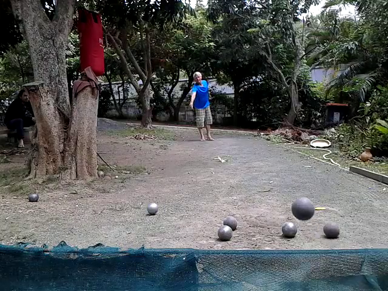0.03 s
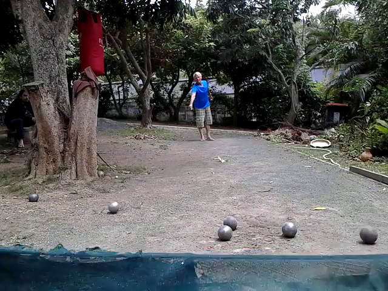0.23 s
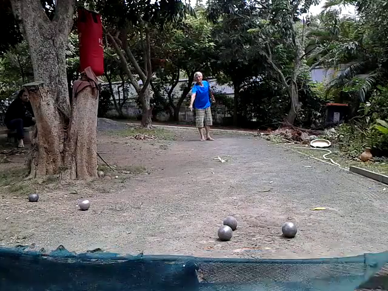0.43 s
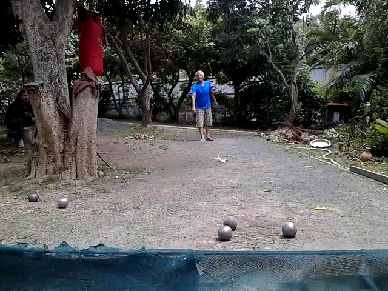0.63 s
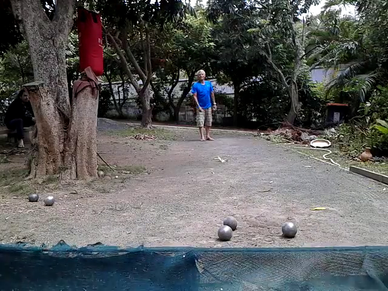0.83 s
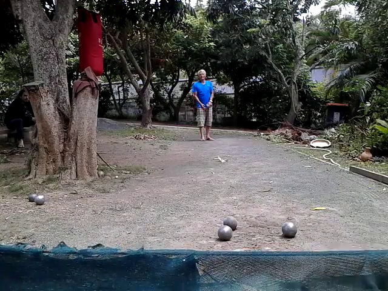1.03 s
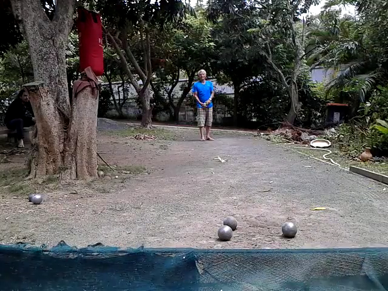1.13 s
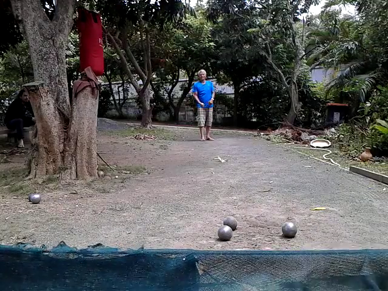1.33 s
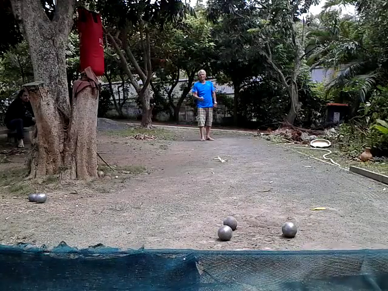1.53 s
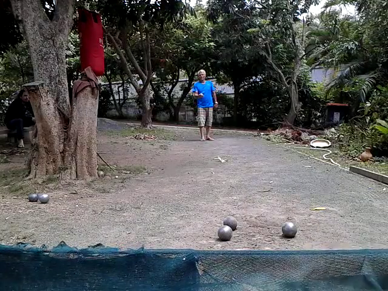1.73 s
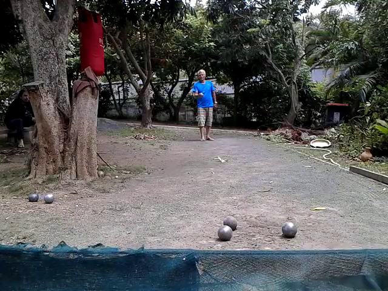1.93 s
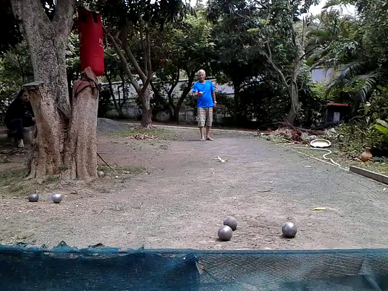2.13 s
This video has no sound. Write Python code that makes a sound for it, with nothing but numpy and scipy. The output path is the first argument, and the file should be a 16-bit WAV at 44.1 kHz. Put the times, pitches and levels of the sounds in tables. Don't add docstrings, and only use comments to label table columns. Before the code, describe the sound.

A heavy metal ball strikes metal edging very close to a small overloading microphone, clanging, scraping and rattling in quick bounces, then rolls and taps over gravel while distant birds chirp and whistle in a garden.

```python
import sys
import numpy as np
from scipy import signal
from scipy.fft import rfft, irfft
from scipy.io import wavfile
from scipy.ndimage import uniform_filter1d

SR = 44100
rng = np.random.default_rng(int(sys.argv[2]) if len(sys.argv) > 2 else 0)


def output_pcm(signal):
    pcm = np.clip(np.atleast_2d(signal).T, -1, 1) * 32767
    wavfile.write(sys.argv[1], SR, np.round(pcm).astype(np.int16))


def field_ratio(decibels):
    return 10 ** (np.asarray(decibels, dtype=float) / 20)


N = 97020
T = np.arange(N) / SR

# (frequency [Hz], density [dB per Hz])
AIR_COLOUR = [(18, -54.5), (30, 17.5), (312, -3), (774, -7), (1520, -11.5), (1780, -40), (2630, -7),
              (4900, -5), (15000, -76)]
# (time [s], level [dB])
ROLL = [
    (0, -28),
    (.05, -33.5),
    (.1, -38.5),
    (.15, -44.5),
    (.45, -40),
    (.7, -52),
    (1.1, -57.5),
    (1.19, -59),
    (1.3, -51),
    (1.4, -60.5),
]
# (frequency [Hz], density [dB per Hz])
GRAVEL_COLOUR = [(47, -48), (80, 4), (148, 2.5), (499, -15), (1500, -3), (2160, -5), (5240, -13),
                 (8000, -62.5), (10400, -84), (17600, -120)]
TAP_S = [.0050, .0710, .0895, .1590, .1592, .1830, .2357, .2399, .262, .265, .312, .315, .380, .442, .4455,
         .4462, .4465, .4615, .6320, .8545, .925, .933, 1.1695, 1.1703, 1.1710, 1.1712, 1.1713, 1.1716,
         1.261, 1.89]
# (level [dB], frequency [Hz], t60 [s])
TAP_MODES = [(-23, 1800, .014), (-24.5, 1910, .012), (-26, 2600, .012), (-26.5, 470, .04),
             (-21.5, 2300, .007), (-37, 4100, .0055), (-25, 7200, .05), (8, 3000, 0.00352),
             (-16.5, 1150, 0.12), (-17, 70.4, .1), (-14.5, 4200, 0.3), (-18.5, 1610, .25),
             (-28, 4200, 0.12), (-25.5, 118, 0.068), (-6, 3800, 0.012), (-12.5, 1411, 0.061),
             (-20, 1520, 0.092), (-15.5, 1800, 0.01), (-25.5, 1620, 0.013), (-32, 1200, 0.0082),
             (-36.5, 6900, 0.015), (-44.5, 7900, 0.011), (-23, 2800, 0.0021), (-5.5, 3770, 0.0079),
             (-25.5, 2100, 0.0042), (-14, 1160, 0.0043), (-5.5, 378, 0.02), (-4.5, 859, 0.0087),
             (-25.5, 408, .017), (-44.5, 280, 0.072)]
# (time [s], level [dB])
BUMPS = [(0.159, -28), (0.419, -31.5), (0.445, -27.5), (0.463, -22), (0.485, -26.5), (.503, -23.5),
         (0.531, -35), (.552, -35), (0.571, -27.5), (0.607, -29.5), (0.634, -31.5), (.66, -35),
         (0.686, -31.5), (0.712, -34.5), (.740, -30), (0.783, -31), (0.821, -26.5), (0.834, -25),
         (0.849, -25.5), (.893, -26), (0.919, -26), (.962, -22), (.974, -23.5), (0.996, -24), (1.022, -33),
         (1.078, -29)]
# (time [s], level [dB])
TICKS = [(.1595, -31), (0.447, -18.5), (.4985, -44.5), (0.571, -44), (0.5833, -44), (0.6332, -32),
         (.6880, -40), (.7605, -45.5), (0.7825, -43), (0.8125, -41.5), (0.8543, -39), (.8940, -51),
         (0.927, -38.5), (0.934, -38.5), (1.159, -41), (1.26, -45), (1.2780, -34), (1.2844, -35.5)]
# (frequency [Hz], density [dB per Hz])
TICK_COLOUR = [(300, -20), (1500, 0), (3500, -2), (5500, -6), (7500, -20), (15000, -45)]
# (time [s], length [s], start frequency [Hz], end frequency [Hz], level [dB])
CHIRPS = [(0.183, 0.04, 3400, 4660, -38.5), (0.189, 0.023, 5900, 6170, -47),
          (0.222, 0.015, 4750, 4800, -32.5), (0.5, 0.04, 4425, 3250, -36), (0.533, 0.02, 4100, 3620, -45),
          (0.691, 0.022, 6100, 5650, -45), (0.7, 0.011, 4250, 4000, -32), (0.708, 0.016, 5600, 4770, -42),
          (0.725, 0.013, 4400, 3460, -36), (.754, 0.01, 4300, 3500, -32), (0.779, 0.02, 4200, 3380, -40),
          (1.01, 0.045, 5600, 6760, -57.5), (1.054, 0.0074, 4000, 6140, -33),
          (1.063, 0.033, 4200, 4930, -38.5), (1.079, 0.023, 6200, 3395, -34),
          (1.12, 0.018, 4600, 3283, -29.5), (1.148, 0.025, 3500, 5580, -35),
          (1.185, 0.028, 5500, 3320, -48), (1.395, 0.028, 3300, 4360, -47.5),
          (1.433, 0.022, 5200, 6360, -39.5), (1.492, 0.019, 6280, 6170, -58),
          (1.455, .025, 6400, 4750, -41.5), (1.524, 0.02, 3900, 4320, -45.5),
          (1.532, 0.031, 4800, 5410, -43), (1.582, 0.045, 5300, 3840, -49.5),
          (1.736, 0.0206, 5310, 5370, -41.5), (1.755, 0.028, 5360, 5770, -42),
          (1.76, 0.031, 5300, 3250, -35), (1.804, 0.04, 4042, 2860, -36), (1.868, 0.035, 4540, 4780, -38),
          (1.877, 0.037, 3000, 3897, -36), (1.928, 0.05, 4100, 3090, -40.5), (2.05, 0.03, 4250, 3623, -41),
          (2.098, 0.039, 3800, 3000, -46.5)]
# (time [s], level [dB])
SCRAPE = [
    (.240, -9.5),
    (.262, -20),
    (.295, -18),
    (.330, -16.5),
    (.365, -27),
    (.400, -27.5),
    (.438, -74),
]
# (frequency [Hz], density [dB per Hz])
SCRAPE_COLOUR = [(60, -37), (150, -10.5), (900, -11.5), (2860, -8), (6800, -10), (7800, -28.5),
                 (11000, -35.5), (15500, -45.5)]
# (time [s], strength [dB])
BLOWS = [
    (.2410, 0),
    (.2463, -5),
    (.2745, -8),
    (.3105, -10.5),
    (.3250, -10.5),
    (.4442, -25.5),
]
EDGE_HZ = [2345, 2860, 3052, 3618, 3827, 4034, 4464, 5142, 5387, 5877, 6384, 6644, 6906, 7183]
# (level [dB], t60 [s])
EDGE_MODES = [(-37, 0.201), (-1, 0.26), (-8.5, 0.46), (-5.5, 0.25), (5, 0.31), (-9.5, 0.3), (-8.5, .2),
              (-18, 0.14), (-7, 0.23), (1.5, 0.13), (-6, 0.35), (-0.5, 0.24), (-8, 0.18), (-4.5, 0.22)]
# (frequency [Hz], level per mode [dB], t60 [s])
SHEET = [(151.3, -19.5, 0.33), (490, -28, 0.18), (1500, -29, 0.23), (3000, -21.5, 0.28), (6550, -14, 0.11),
         (7300, -31, 0.2), (10700, -32, 0.12), (15340, -46, .15)]
# (time [s], level [dB], frequency [Hz], t60 [s])
RATTLE = [
    (0.2744, 7.5, 2876, 0.012),
    (0.2793, 7.5, 3010, 0.0084),
    (0.3, -7.5, 3100, 0.022),
    (0.311, -0.5, 2746, 0.022),
    (0.324, -6, 2945, 0.049),
    (0.342, -12, 2940, 0.034),
    (.3600, -7, 2780, 0.021),
    (0.38, -16, 2870, 0.021),
    (.3950, -14, 3060, 0.031),
]
# (frequency [Hz], level [dB], t60 [s])
REBOUND_MODES = [(5320, -37, 0.093), (6643, -34.5, 0.074), (7110, -42, .07), (7200, -45, .08),
                 (7720, -37, 0.12), (8570, -47.5, .08), (8800, -47, 0.1), (9100, -43, 0.12),
                 (9600, -47, 0.17), (10100, -49.5, 0.07), (11940, -48.5, 0.12), (13900, -48.5, 0.05)]
# (frequency [Hz], level [dB], t60 [s])
CLINK_MODES = [(6850, -49, 0.076), (7460, -47, 0.095), (7750, -56, 0.046), (8350, -56, 0.036),
               (8900, -56, 0.045)]
# (time [s], length [s], level [dB], start frequency [Hz], end frequency [Hz])
WHISTLES = [
    (0.95, 0.044, -34, 2700, 2673),
    (1.172, 0.059, -30, 2700, 2726),
    (1.409, 0.019, -32.5, 2680, 2728),
    (1.429, 0.018, -34, 2720, 2804),
    (1.449, .03, -33, 2790, 2787),
    (1.664, .023, -30, 2800, 2762),
    (1.690, 0.01392, -32, 2740, 2687),
    (1.913, 0.048, -28, 2900, 2724),
]

REBOUND_S = .4442
TAP_RISE_S = .0006


def read(table, hz, col=1):
    points = np.array(table)
    return np.interp(np.log(hz), np.log(points[:, 0]), points[:, col])


def noise(colour):
    hz = np.arange(1, N // 2 + 2) * SR / N
    x = irfft(rfft(rng.standard_normal(N)) * field_ratio(read(colour, hz)), N)
    return x / x.std()


def walk(rate_hz):
    hold = int(SR / rate_hz)
    steps = rng.standard_normal(N)[np.arange(N) // hold]
    return 1.3 * uniform_filter1d(uniform_filter1d(steps, hold), hold)


def add_mode(out, start_s, db, hz, t60_s, rise_s=0):
    i = int(np.ceil(start_s * SR))
    t = T[i:i + int(1.2 * t60_s * SR) + 8] - start_s
    rise = np.sin(np.pi / 2 * np.minimum(t / (rise_s + 1e-9), 1)) ** 2
    out[i:i + len(t)] += field_ratio(db - 60 * t / t60_s) * np.sin(2 * np.pi * hz * t) * rise


def note(start_s, length_s, hz, db):
    arch = np.sin(np.pi * np.clip((T - start_s) / length_s, 0, 1))
    phase = 2 * np.pi * np.cumsum(hz + 0 * T) / SR
    return field_ratio(db) * np.clip(arch * 2.6, 0, 1) * np.sin(phase)


def glide(start_s, length_s, start_hz, end_hz):
    return np.interp(T, [start_s, start_s + length_s], [start_hz, end_hz])


def garden(x, t60_s, gap_s):
    t = T[:SR]
    decay_db = 1.5 * walk(90)[:SR] - 60 * t / t60_s
    ir = rng.standard_normal(SR) * field_ratio(decay_db) * np.clip(t / gap_s, 0, 1)
    return signal.fftconvolve(x, ir / np.sqrt(np.sum(ir ** 2)))[:N]


def air():
    return noise(AIR_COLOUR) * field_ratio(-47 + 1.8 * walk(7.81))


def rolling():
    level_db = np.interp(T, *np.array(ROLL).T)
    return field_ratio(level_db + 1.8 * walk(170) + 2.0 * walk(30)) * noise(GRAVEL_COLOUR)


def taps():
    crack_db, crack_tilt_db, crack_t60_s = -11, -9, .007
    out = np.zeros(N)
    for s, (db, hz, t60_s) in zip(TAP_S, TAP_MODES):
        add_mode(out, s, db, hz, t60_s, TAP_RISE_S)
        low_hz, high_hz = hz * .4, min(hz * 3.5, 6300)
        for u in rng.random(9):
            crack_hz = low_hz + u * (high_hz - low_hz)
            add_mode(out, s, db + crack_db + crack_tilt_db * u, crack_hz, crack_t60_s, TAP_RISE_S)
    return out


def bumps():
    base_hz, fall_hz_per_s, t60_s = 296, 237, 0.05
    out = np.zeros(N)
    for s, db in BUMPS:
        pitch_luck, overtone_luck = rng.random(2)
        hz = (base_hz - fall_hz_per_s * max(s - REBOUND_S, 0)) * (0.774 + 0.39 * pitch_luck)
        add_mode(out, s, db, hz, t60_s, rise_s=0.0012)
        add_mode(out, s, db - 9.0, hz * (1.7 + overtone_luck), t60_s, rise_s=0.0084)
    return out


def grit():
    t60_s = .012
    gate = np.zeros(N)
    for s, db in TICKS:
        slope_s = np.where(T > s, t60_s, t60_s / 5)
        gate += field_ratio(db - 60 * np.abs(T - s) / slope_s)
    return noise(TICK_COLOUR) * gate


def chirps():
    trill = 1 + .035 * walk(900)
    chirp = sum(note(s, length_s, glide(s, length_s, start_hz, end_hz) * trill, db)
                for s, length_s, start_hz, end_hz, db in CHIRPS)
    return field_ratio(-8) * chirp + field_ratio(3.5) * garden(chirp, t60_s=.6, gap_s=0.0012)


def scrape():
    level_db = np.interp(T, *np.array(SCRAPE).T, left=-150, right=-150)
    return field_ratio(level_db + 2.4 * walk(260)) * noise(SCRAPE_COLOUR)


def blows():
    out = np.zeros(N)
    small_hz = 150 * 100 ** (rng.random(150) ** .4)
    edge = [(hz, db, t60_s, True) for hz, (db, t60_s) in zip(EDGE_HZ, EDGE_MODES)]
    sheet = [(hz, read(SHEET, hz), read(SHEET, hz, 2), False) for hz in small_hz]
    for k, (s, blow_db) in enumerate(BLOWS):
        edge_db = -16 if 0 < k < len(BLOWS) - 1 else 0
        damp = .5 if s >= REBOUND_S else 1
        for hz, mode_db, t60_s, is_edge in edge + sheet:
            level_luck, delay_luck = rng.standard_normal(2)
            delay_s = 12 / max(hz, 2500) * (1 + 0.2006 * abs(delay_luck)) - .0017
            uneven_db = edge_db if is_edge else 4 * level_luck
            add_mode(out, s + delay_s, blow_db + mode_db - 7.5 + uneven_db, hz, t60_s * damp)
    return out


def rattle():
    out = np.zeros(N)
    for row in RATTLE:
        add_mode(out, *row, rise_s=0.00052)
    return out


def squeal():
    return note(.308, .0538, 5613, -12.5)


def rebound():
    out = np.zeros(N)
    for hz, db, t60_s in REBOUND_MODES:
        add_mode(out, REBOUND_S, db, hz, t60_s)
        for u in rng.standard_normal(5):
            add_mode(out, REBOUND_S, db - 7.5, hz * (1 + u / 20), t60_s / 3)
    return out


def clink():
    out = np.zeros(N)
    for hz, db, t60_s in CLINK_MODES:
        add_mode(out, .7565, db, hz, t60_s, TAP_RISE_S)
    return out


def whistles():
    whistle = np.zeros(N)
    for s, length_s, db, start_hz, end_hz in WHISTLES:
        hz = glide(s, length_s, start_hz, end_hz) * (1 + 0.006 * walk(220))
        whistle += note(s, length_s, hz, db)
    whistle *= field_ratio(2.5 * walk(90))
    return whistle + field_ratio(-6) * garden(whistle, t60_s=0.54, gap_s=0.014)


def coo():
    out = np.zeros(N)
    for k in (1, 2):
        out += note(1.42, .09, k * 420 * (1 + .1 * walk(450)), -54.5 + 4 * k)
    return out


def scene():
    balls = rolling() + taps() + bumps() + grit() + clink()
    edging = scrape() + blows() + rattle() + squeal() + rebound()
    near = balls + edging
    dull = signal.sosfilt(signal.butter(2, 6000, fs=SR, output="sos"), near)
    echo = field_ratio(-11.5) * garden(dull, t60_s=0.37, gap_s=0.0097)
    return (near + echo + chirps() + whistles() + coo() + air())[None]


def low_pass(x):
    return signal.sosfilt(signal.butter(12, 15630, fs=SR, output="sos"), x)


def record(dry):
    low_hz, top_hz, drive_db, hiss_db = 189, 15600, -0.5, -81
    thin = signal.sosfilt(signal.butter(2, low_hz, "highpass", fs=SR, output="sos"), dry)
    clipped = np.clip(field_ratio(drive_db) * thin, -1, 1)
    limited = signal.sosfilt(signal.ellip(8, .2, 50, top_hz, fs=SR, output="sos"), clipped)
    return low_pass(limited + field_ratio(hiss_db) * rng.standard_normal(N))


dry = scene()
out = record(dry)
output_pcm(out)
```